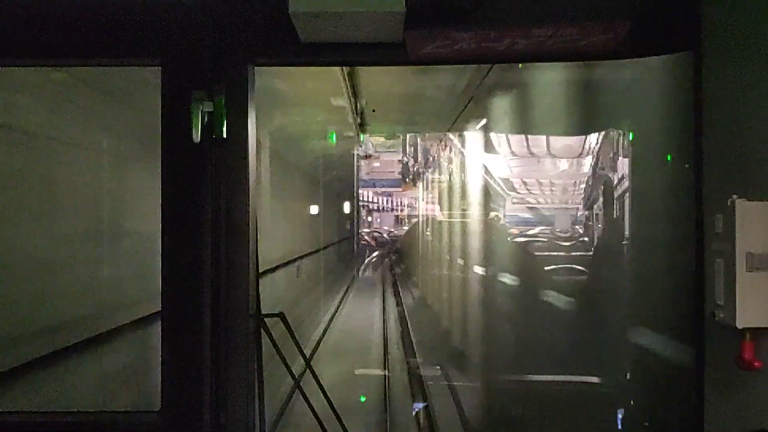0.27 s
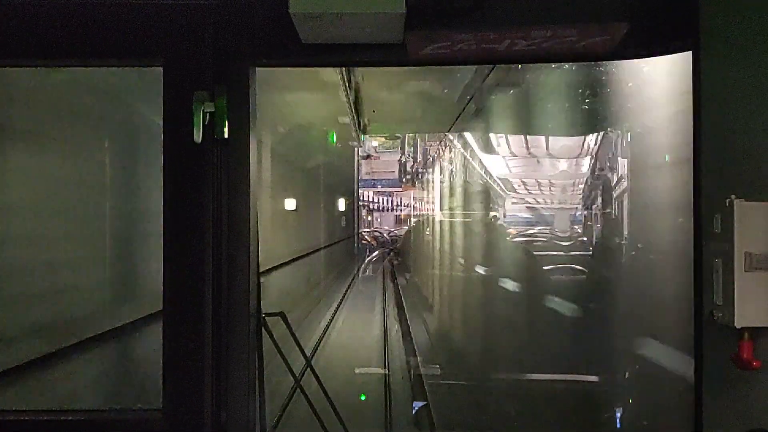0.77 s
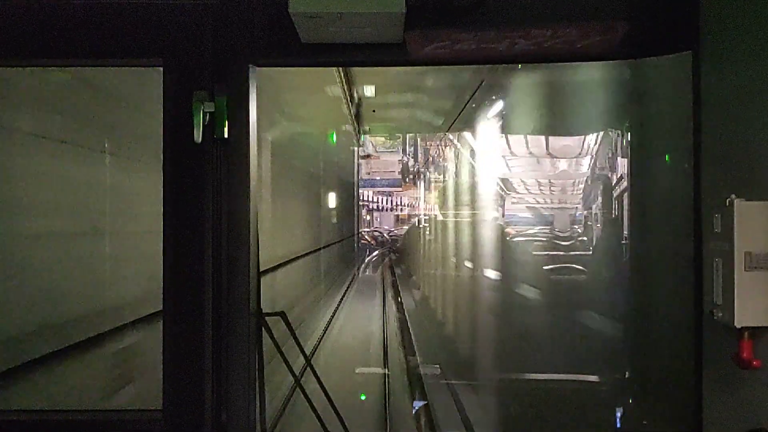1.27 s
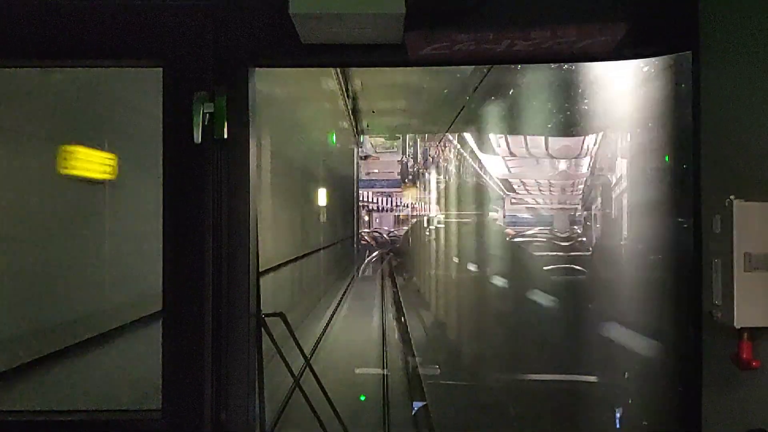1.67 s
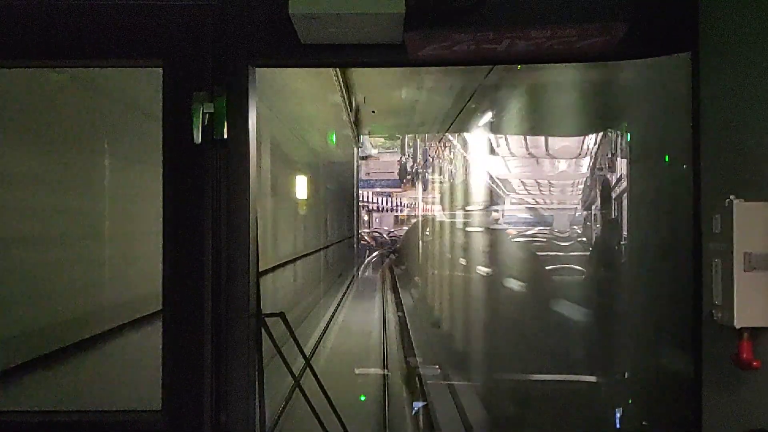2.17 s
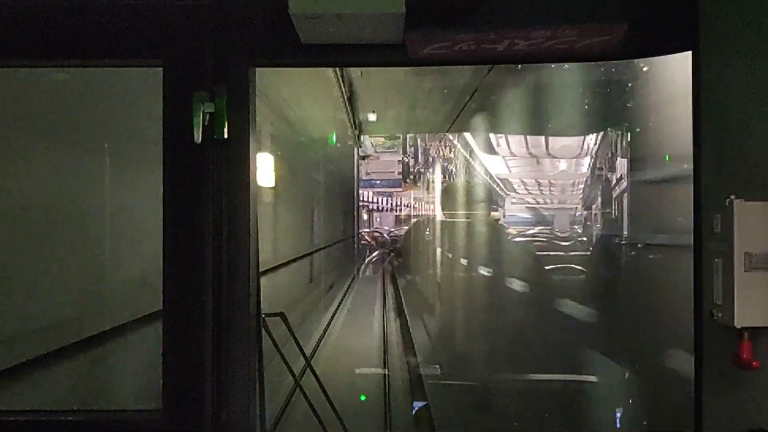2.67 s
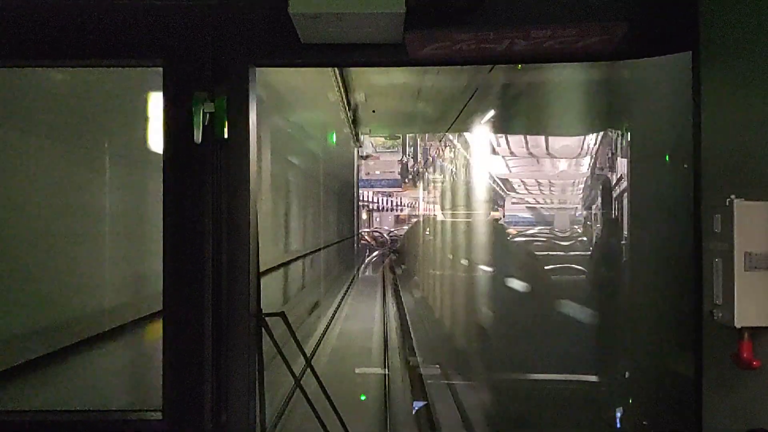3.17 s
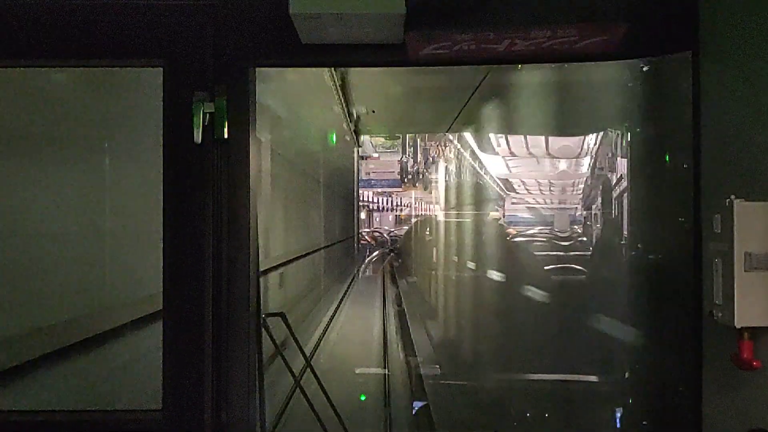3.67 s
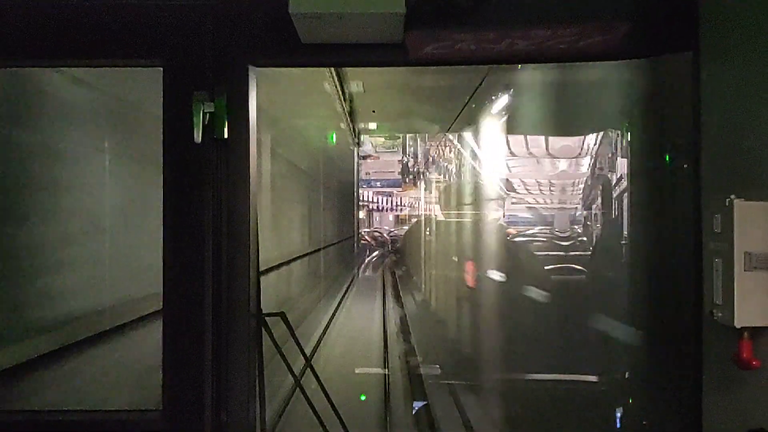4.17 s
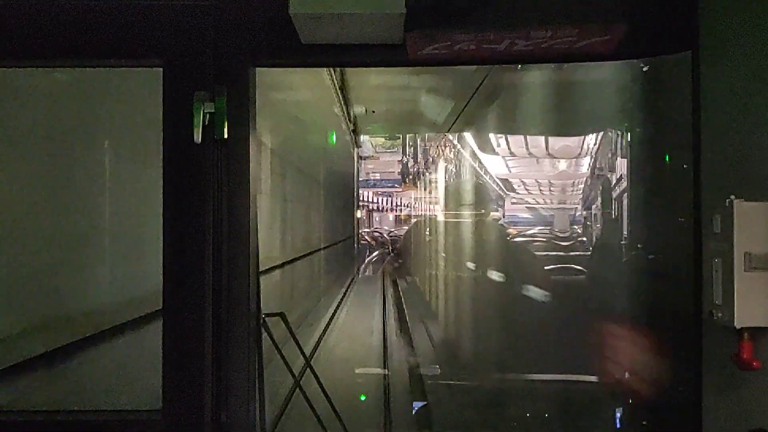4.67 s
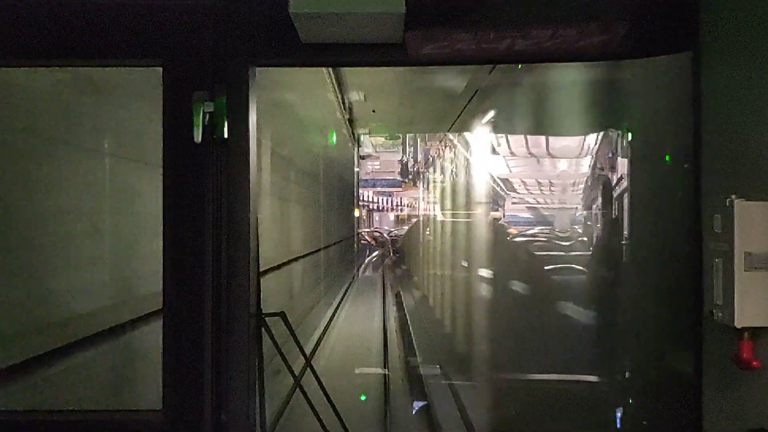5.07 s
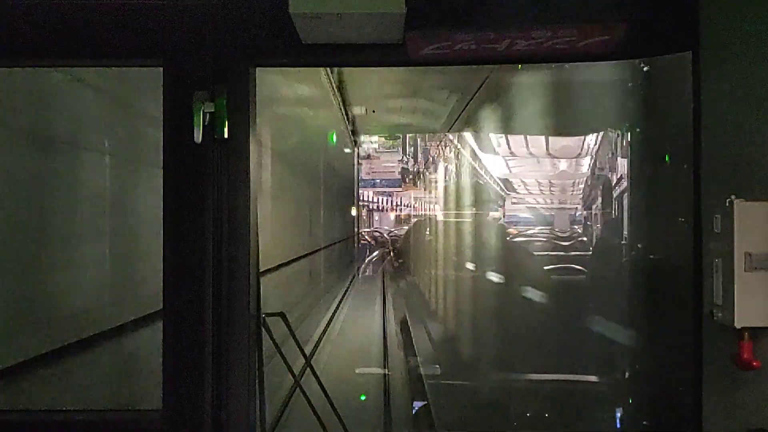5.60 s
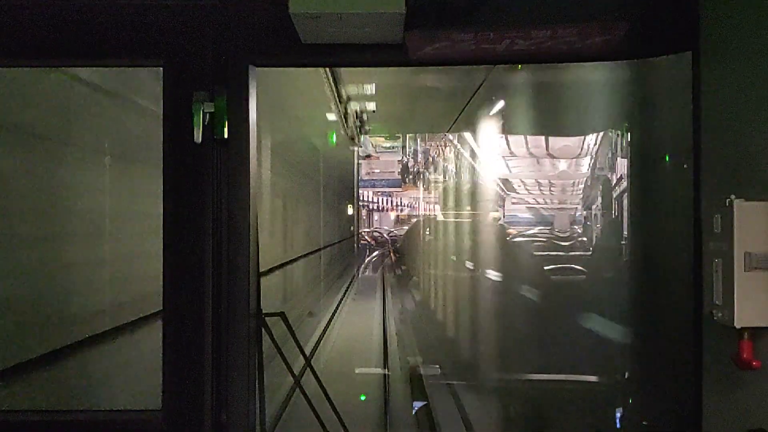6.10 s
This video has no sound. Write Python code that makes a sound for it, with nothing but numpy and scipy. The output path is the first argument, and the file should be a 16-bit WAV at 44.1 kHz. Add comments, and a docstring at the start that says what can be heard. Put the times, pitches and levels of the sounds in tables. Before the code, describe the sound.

Heard inside the front cab of an electric train running through a tunnel. A continuous, noisy wheel roar dominates, strongest in hollow, broad resonances in the middle range, fluttering slightly, with a faint wheel singing that comes and goes. Underneath lie a deep body rumble and a soft, wavering electric hum; above, a very thin airy hiss. At about 0.1 to 0.2 s three close wheel clashes strike a rail joint, blurred and drawn out by the tunnel, with slight rattling. Softer, duller, longer clashes follow at 0.9, 1.1 and 1.35 s. The roar gradually eases, swelling briefly around 2.5 s over a worn patch, then stays smoother and quieter. Tiny bright ticks sound at 2.7 and, fainter, 3.1 s. From 5.55 to 5.8 s a rapid flurry of low thumps booms through the floor, growing stronger, with fittings chattering, then fading into the steady rolling.

```python
"""Tunnel train, front cab

An electric train rolls through a tunnel: rough rails make wheels and track ring in broad resonances.
Wheels clash over a rail joint, axle after axle, as noise bursts that the tunnel draws out.
The rail grows smoother but for one worn patch; later the car thumps over an uneven stretch and loose
fittings rattle. Below lie filtered-noise rumble and hiss and a wavering electric hum."""
import sys
import numpy as np
from scipy import signal
from scipy.fft import rfft, irfft, next_fast_len
from scipy.io import wavfile
from scipy.ndimage import map_coordinates

SR = 44100
rng = np.random.default_rng(int(sys.argv[2]) if len(sys.argv) > 2 else 0)


def log_audio(samples):
    """Write samples as a 16-bit WAV file to the path given in sys.argv[1]."""
    # one column per channel
    frames = np.atleast_2d(samples).T
    # limit to full scale, then quantise
    limited = np.clip(frames, -1, 1)
    pcm = np.round(limited * 32767).astype(np.int16)
    wavfile.write(sys.argv[1], SR, pcm)


N = 279594  # length in samples

# Wheel and track resonances: f/Hz, width/Hz, level/dB (relative)
WHEEL_MODES = [(531.6, 76, -9.5), (633, 102, -6.5), (708, 97, -0.5), (775, 84.6, 0), (1031, 150, -14),
               (1186, 130, -15.5), (1511, 170, -12.5), (1847, 170, -24), (2033, 196, -24.5),
               (2770, 200, -35.5), (3426, 140, -46), (3680, 250, -50)]
# Broad roar under the resonances: f/Hz, level/dB (relative, per Hz)
ROAR_CURVE = [(150, -37), (300, -14), (480, -17.5), (900, -17), (1350, -19.5), (1750, -30), (2300, -38),
              (2550, -42), (3100, -44), (4000, -58), (5000, -86)]
# Level on smooth rail, and what rough rail and the worn patch add to it
ROLL_DB, ROUGH_DB, PATCH_ROLL_DB = -33.5, 4, 1.5


def rolling(flutter_db=0.74, swell_db=1.58):
    """Rail roughness drives the wheels; each resonance swells and sinks on its own."""
    ring = np.zeros(N)
    for centre, width, db in WHEEL_MODES:
        mode = coloured(lambda hz: peak(hz, centre, width))
        ring += amp(db + swell_db * wobble(18)) * mode
    roar = coloured(lambda hz: shape(ROAR_CURVE, hz))
    rail_db = ROUGH_DB * roughness() + PATCH_ROLL_DB * patch()
    level_db = ROLL_DB + rail_db + flutter_db * wobble(40)
    return amp(level_db) * unit(ring + roar)


def wheel(hz):
    """Response of wheels and track as heard through the cab walls."""
    return np.sqrt(modes_gain(WHEEL_MODES, hz) ** 2 + shape(ROAR_CURVE, hz) ** 2)


SMOOTH_S = 2.65  # the rail is smooth from here on


def roughness():
    """Roughness of the rail, from 1 at the start to 0 once it is smooth."""
    return np.clip(1 - clock() / SMOOTH_S, 0, 1)


PATCH_S, PATCH_HALF_S = 2.48, 0.28  # middle and half length of the worn patch


def patch():
    """How far the wheels are on the worn patch, 0-1."""
    return np.exp(-((clock() - PATCH_S) / PATCH_HALF_S) ** 2)


# Wheel modes that sing: f/Hz, width/Hz, level/dB
SINGING_MODES = [(780.4, 70, -41.5), (1548, 90, -53), (2790, 130, -75)]


def singing(swell_db=3.5, rate=18):
    """Narrow wheel modes come and go."""
    out = np.zeros(N)
    for centre, width, db in SINGING_MODES:
        mode = noise(lambda hz: peak(hz, centre, width))
        out += amp(db) * unit(amp(swell_db * wobble(rate)) * mode)
    return out


# Wheels striking the rail joint: t/s, distance behind the cab/m, clash level/dB, rattle level/dB,
# f/Hz of the resonance rung hardest, ring level/dB
AXLE_BLOWS = [(.074, 2.2, -27, -50.5, 1528, -27.5), (.125, 2.3, -31, -59.5, 255, -30.5),
              (.214, 4, -24.5, -47.5, 400, -22.5), (.885, 17, -26.5, -61, 1500, -39.5),
              (1.078, 18, -30, -62, 760, -34.5), (1.345, 24, -35, -68.5, 1426, -35.5)]
# How a joint blow weights the wheel response: f/Hz, level/dB (relative)
CLASH_CURVE = [(220, -7.5), (500, -1), (750, -7), (1000, -1), (1500, 2.5), (1720, 2), (2000, 9.5),
               (2450, -4), (2800, 6), (4000, -7)]
# A blow right under the cab: its rise and decay, then width and decay of the resonance it rings
RISE_S, CLASH_T60, RING_WIDTH_HZ, RING_T60 = 0.03, 0.77, 135, 0.6
RING_LEAD_S = .008  # the resonance speaks this long before the clash
# Distance at which the tunnel doubles a blow's length; dulling in dB per octave per metre
SMEAR_M, DULL_DB_PER_M = 20, 0.18


def joints():
    """Each wheel clashes and rings one resonance; distance dulls the clash and lengthens both."""
    out = np.zeros(N)
    for s, metres, clash_db, _, ring_hz, ring_db in AXLE_BLOWS:
        smear = 1 + metres / SMEAR_M
        dulling = -DULL_DB_PER_M * metres
        clash = noise(lambda hz: wheel(hz) * shape(CLASH_CURVE, hz) * tilt(hz, dulling))
        clash_envelope = blow(s, RISE_S * smear, CLASH_T60 * smear)
        out += amp(clash_db) * clash_envelope * clash
        # The ring builds up twice as fast as the clash
        ring = noise(lambda hz: peak(hz, ring_hz, RING_WIDTH_HZ))
        ring_envelope = blow(s - RING_LEAD_S, RISE_S / 2 * smear, RING_T60 * smear)
        out += amp(ring_db) * ring_envelope * ring
    return out


# Jolts on uneven track: t/s, thump level/dB, rattle level/dB
TRACK_JOLTS = [(5.56, -34, -61.5), (5.63, -40.5, -62.5), (5.708, -28.5, -54), (5.76, -30.5, -66),
               (5.805, -27.5, -58)]
# Modes of the car floor: f/Hz, width/Hz, level/dB (relative)
FLOOR_MODES = [(78, 27, -7.5), (108, 24, -2.5), (137, 20, 2), (162, 20, -1.5), (213, 70, -10)]
BOOM_RISE_S, BOOM_T60 = .028, .48


def thumps():
    """Every jolt sets the car floor booming in its modes."""
    out = np.zeros(N)
    for s, db, _ in TRACK_JOLTS:
        boom = noise(lambda hz: modes_gain(FLOOR_MODES, hz))
        out += amp(db) * blow(s, BOOM_RISE_S, BOOM_T60) * boom
    return out


SHAKEN_RISE_S, SHAKEN_T60 = .024, .72  # rattle after a wheel blow
JOLT_RISE_S, JOLT_T60 = .018, .48  # rattle after a jolt


def rattles(bright_db=-1.5):
    """Fittings chatter after each wheel blow and each jolt."""
    out = np.zeros(N)
    for s, _, _, db, _, _ in AXLE_BLOWS:
        out += amp(db) * blow(s, SHAKEN_RISE_S, SHAKEN_T60) * chatter(bright_db)
    for s, _, db in TRACK_JOLTS:
        out += amp(db) * blow(s, JOLT_RISE_S, JOLT_T60) * chatter(bright_db)
    return out


# Ring of the fittings: f/Hz, level/dB (relative, per Hz)
FITTINGS_CURVE = [(2000, -29), (3400, -15.5), (4100, -24.5), (4700, -10), (5000, -7.5), (5500, -4),
                  (5900, -0.5), (6400, -7.5), (7100, -14.5), (7550, -10.5), (8300, -21.5), (8900, -35)]


def chatter(slope, chatter_db=1.5):
    """Quick uneven contacts of the fittings, tilted by slope dB per octave."""
    ring = noise(lambda hz: shape(FITTINGS_CURVE, hz) * tilt(hz, slope))
    return unit(amp(chatter_db * wobble(160)) * ring)


# A loose fitting ticks on its own: t/s, level/dB
LOOSE_TICKS = [(2.696, -56.5), (3.126, -61.5)]
TICK_RISE_S, TICK_T60, TICK_BRIGHT_DB = .005, .29, 6.5  # brightness in dB per octave


def ticks():
    """Short bright ticks of one loose fitting."""
    envelope = sum(amp(db) * blow(s, TICK_RISE_S, TICK_T60) for s, db in LOOSE_TICKS)
    return envelope * chatter(TICK_BRIGHT_DB)


# Rumble of the car body: f/Hz, level/dB (relative, per Hz)
RUMBLE_CURVE = [(8, -13), (20, -9), (29, -3.5), (38, -5.5), (52, 0), (72, -1), (95, -1.5), (120, -3),
                (155, -3), (175, -4.5), (215, -1.5), (255, -8.5), (330, -9.5), (460, -8)]
PATCH_RUMBLE_DB = 2  # what the worn patch adds


def body(level_db=-39.0, swell_db=.5):
    """The car body rumbles on its springs, more on the worn patch."""
    level = amp(level_db + PATCH_RUMBLE_DB * patch() + swell_db * wobble(3))
    return level * noise(lambda hz: shape(RUMBLE_CURVE, hz))


# Electric gear: f/Hz, level/dB, unsteadiness (0-1)
HUM_TONES = [(58.8, -44.5, .2), (106.6, -51, 0.6), (143.2, -50.5, .8)]


def hum(rate=4):
    """Low tones of the electric gear, wavering in strength and phase."""
    out = np.zeros(N)
    for hz, db, unsteady in HUM_TONES:
        waver = 1 - unsteady + unsteady * (wobble(rate) + 1j * wobble(rate))
        tone = np.real(waver * np.exp(2j * np.pi * hz * clock()))
        out += amp(db) * unit(tone)
    return out


# Air hiss in the cab: f/Hz, level/dB (relative, per Hz)
HISS_CURVE = [(2500, -22), (4050, -13), (4500, -6), (4800, -5.5), (5400, -1.5), (5850, 1), (6400, -6.5),
              (6950, -10.5), (7700, -9), (8000, -17), (8400, -19.5), (8800, -40)]


def air(level_db=-65.0, rough_db=1.6, flutter_db=0.3):
    """A thin, nearly steady hiss at the cab, a little stronger on rough rail."""
    level = amp(level_db + rough_db * roughness() + flutter_db * wobble(17))
    return level * noise(lambda hz: shape(HISS_CURVE, hz))


def cab(x, echo_db=-14, t60=0.13, lowest_hz=1800):
    """Glass and metal walls return the treble in dense short echoes, which give it a fine ring."""
    t = np.arange(SR // 4) / SR
    tail = rng.standard_normal(len(t)) * np.exp(-np.log(1000) * t / t60)
    treble_only = signal.butter(3, lowest_hz, "highpass", fs=SR, output="sos")
    tail = signal.sosfilt(treble_only, tail)
    echoes = signal.fftconvolve(x, tail / np.linalg.norm(tail))[:N]
    return x + amp(echo_db) * echoes


def blow(start, rise, t60):
    """Envelope of a blow that builds up and dies away in the reverberation."""
    age = clock() - start
    decay = np.exp(-np.log(1000) * np.maximum(age - rise, 0) / t60)
    return np.clip(age / rise, 0, 1) * decay


def coloured(colour):
    """White noise times a gain that is a function of frequency."""
    size = next_fast_len(N + 8192)
    spectrum = rfft(rng.standard_normal(size))
    return irfft(spectrum * colour(np.fft.rfftfreq(size, 1 / SR)), size)[:N]


def noise(colour):
    """Coloured noise of rms 1."""
    return unit(coloured(colour))


def peak(hz, centre, width):
    """Gain of a resonance with steep skirts, halved at the edges of its width."""
    return 1 / (1 + (2 * (hz - centre) / width) ** 2)


def modes_gain(modes, hz):
    """Joint gain of a set of resonances, summed in power."""
    return np.sqrt(sum((amp(db) * peak(hz, centre, width)) ** 2 for centre, width, db in modes))


def shape(points, hz):
    """Gain of (f/Hz, level/dB) points joined on a log axis, -120 dB beyond both ends."""
    f, db = np.transpose(points)
    return amp(np.interp(np.log(hz + 1), np.log(f + 1), db, left=-120, right=-120))


def tilt(hz, slope):
    """Gain that climbs by slope dB per octave."""
    return amp(slope * np.log2(hz + 1))


def wobble(rate):
    """A smooth random curve, rate knots a second."""
    knots = rng.standard_normal(int(N * rate / SR) + 4)
    return map_coordinates(knots, [clock() * rate])


def amp(db):
    """Decibels to gain."""
    return 10 ** (np.asarray(db) / 20)


def unit(x):
    """Scaled to rms 1."""
    return x / np.sqrt(np.mean(x ** 2) + 1e-30)


def clock():
    """The time of every sample in seconds."""
    return np.arange(N) / SR


def scene():
    """Everything heard in the cab."""
    wheels = rolling() + singing() + joints()
    shaken_car = thumps() + rattles() + ticks()
    background = body() + hum() + air()
    return cab(wheels + shaken_car + background)[None]


TOP_HZ = 8800


def record(dry):
    """Band limit: nothing passes from TOP_HZ upwards."""
    size = next_fast_len(N + SR // 2)
    passed = np.fft.rfftfreq(size, 1 / SR) < TOP_HZ
    return irfft(rfft(dry, size) * passed, size)[:, :N]


dry = scene()
out = record(dry)
log_audio(out)
```